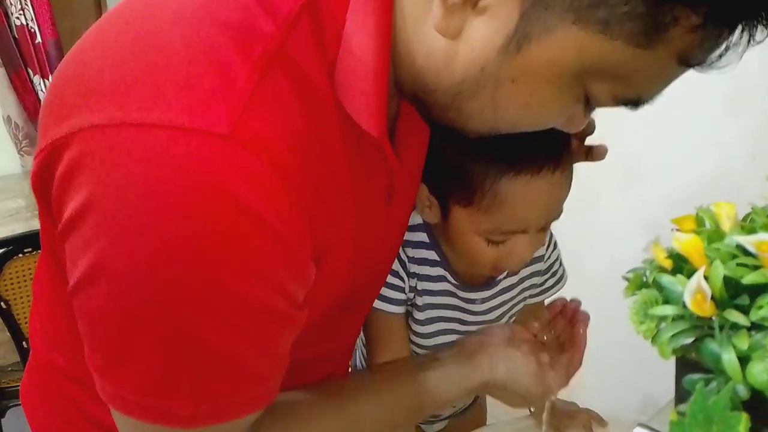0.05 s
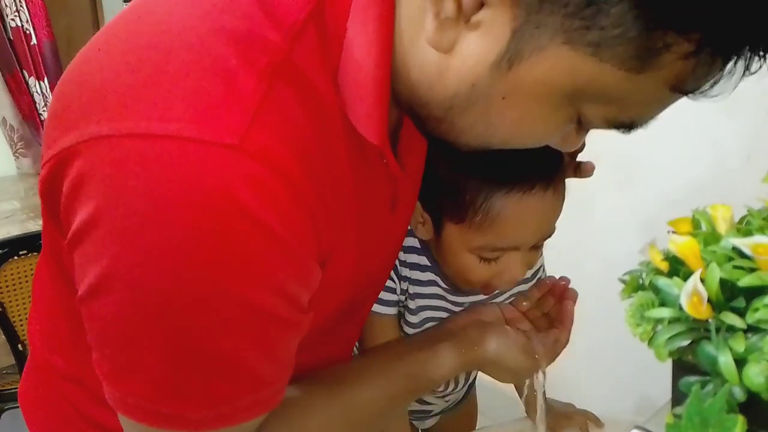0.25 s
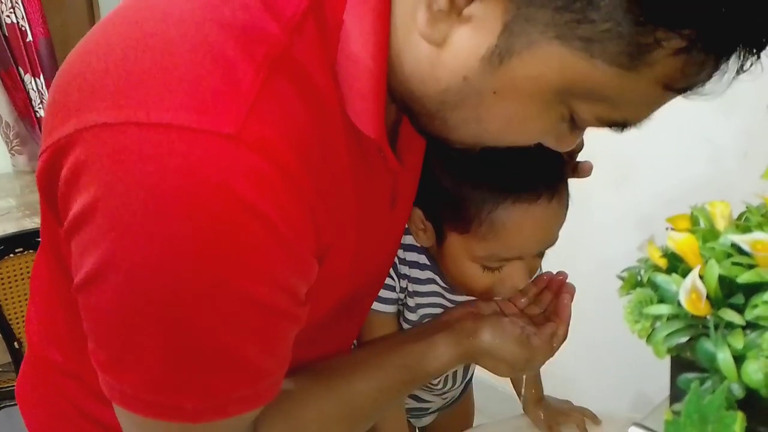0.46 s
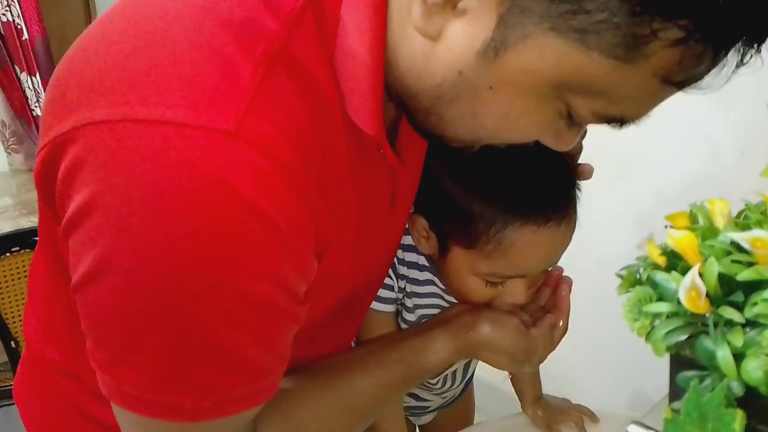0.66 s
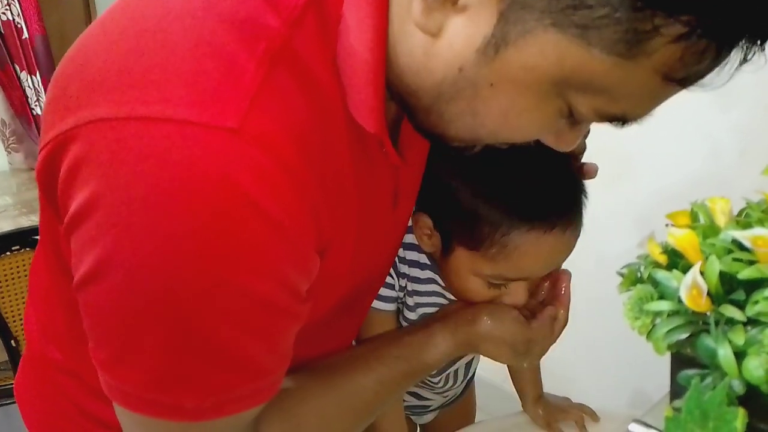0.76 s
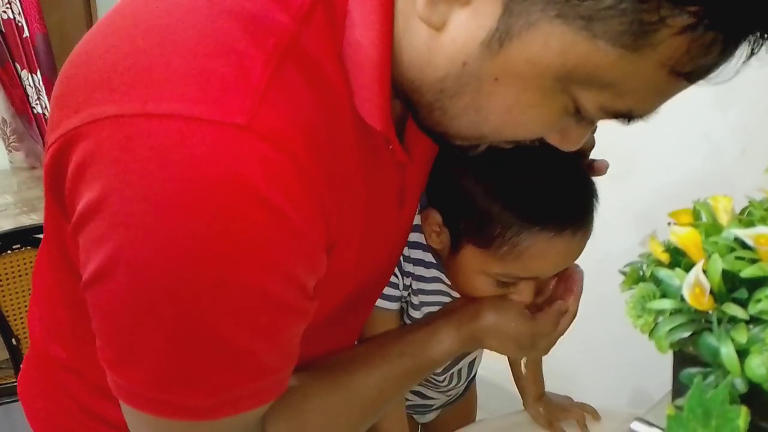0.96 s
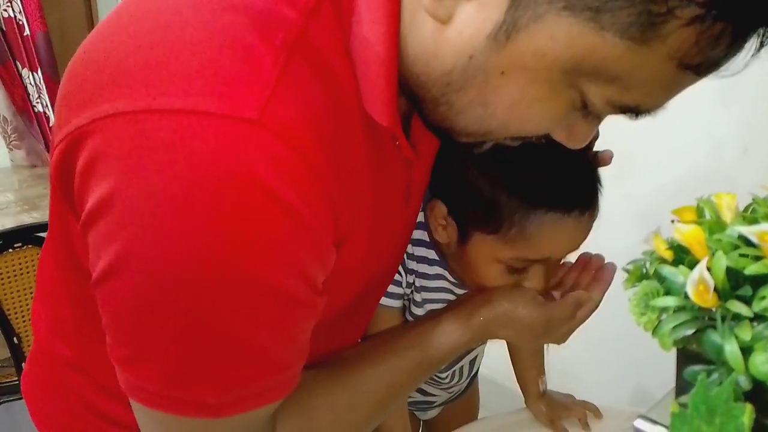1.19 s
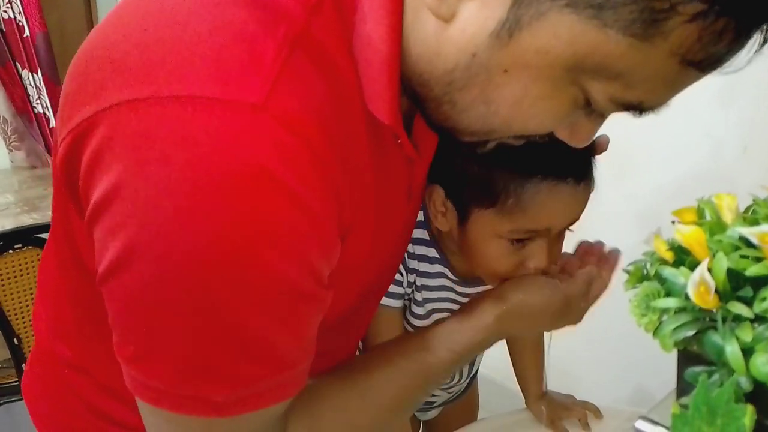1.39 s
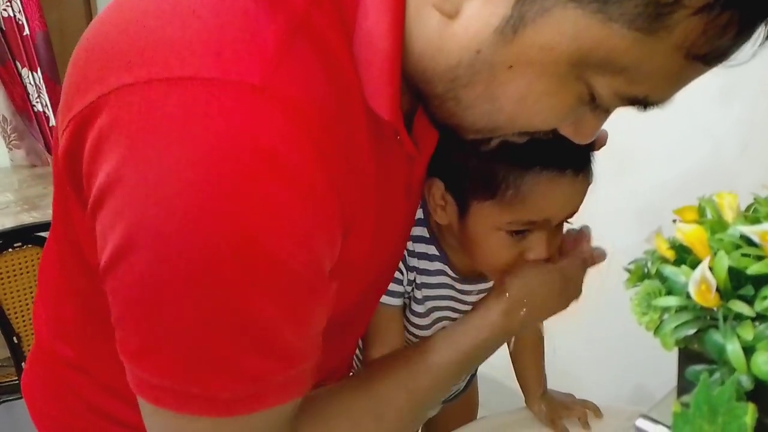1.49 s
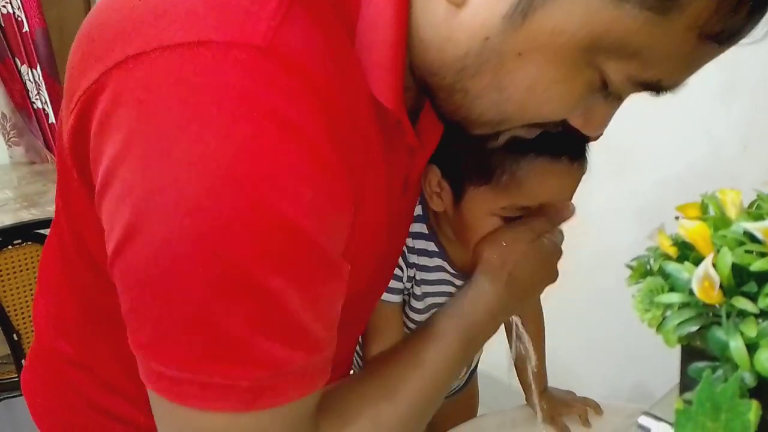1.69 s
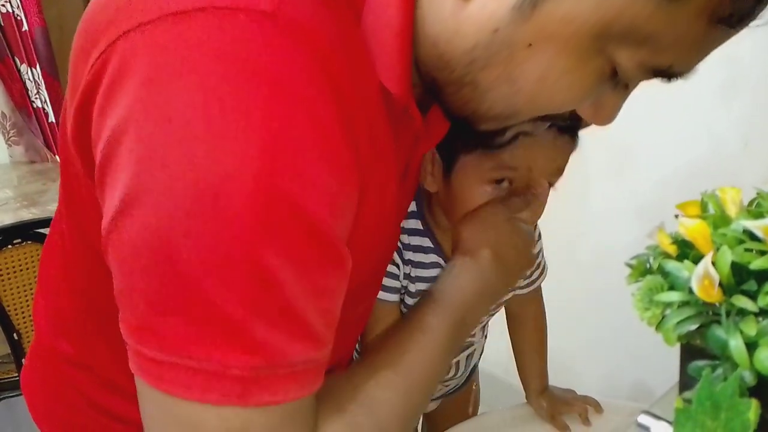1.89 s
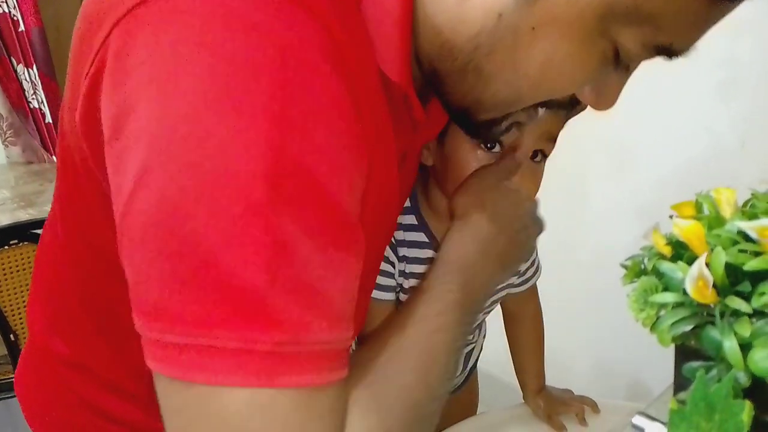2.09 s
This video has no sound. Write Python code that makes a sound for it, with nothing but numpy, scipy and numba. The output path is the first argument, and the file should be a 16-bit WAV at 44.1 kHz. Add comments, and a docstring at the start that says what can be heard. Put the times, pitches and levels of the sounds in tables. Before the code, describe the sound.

A steady splashy trickle of water falls through hands into a sink, plopping unevenly, then bursting into a denser gurgle near the end; a faint machine hum sits beneath, close phone microphone, short room reflections.

```python
"""Tap water over cupped hands

Water runs over cupped hands into a basin in a small hard-walled room, heard from a phone a step away.
Thousands of short sines (gliding bubbles and steady-pitched droplet ticks) and hiss, filtered, make the stream.
Louder, timed bubble tones plop as short rings, droplets splat as noise bursts, and walls add a short tail.
A machine hums one wavering sine over a faint mains tone and a low rumble of filtered noise."""
import sys
import numpy as np
from scipy import signal
from scipy.fft import rfft, irfft
from scipy.io import wavfile
from scipy.ndimage import uniform_filter1d
from numba import njit

SR = 44100
rng = np.random.default_rng(int(sys.argv[2]) if len(sys.argv) > 2 else 0)


def boost(x):
    """Linear amplitude factor 10**(x/20) for a level x in decibels (scalar or array-like)."""
    u = np.asarray(x, float) / 20
    return 10 ** u


def put_to_file(sound):
    """Save the sound as 16-bit audio at rate SR, in the file named by the first command-line argument."""
    columns = np.atleast_2d(sound).T  # one column per channel
    safe = np.clip(columns, -1, 1)
    whole_steps = np.round(safe * 32767)
    wavfile.write(sys.argv[1], SR, whole_steps.astype(np.int16))


N = 94506  # length in samples

# colour of the low rumble: f/Hz, relative level/dB
RUMBLE_COLOUR = [(25, -44), (70, -27), (98, -21.5), (115, -19.5), (165, -24.5), (215, -4), (300, -3.5),
                 (370, 0.5), (450, -12), (490, -11.5), (520, -7.5), (560, -17), (700, -22.5), (1200, -35)]
# swell of the low rumble: t/s, rms level/dB
RUMBLE_SWELL = [(0, -42), (.12, -43), (.3, -46.5), (.55, -47.5), (.75, -44.5), (1, -49.5), (1.15, -45),
                (1.25, -47), (1.45, -42), (1.78, -48.5), (1.9, -44.5), (2.14, -47)]
# decay of the wall echoes, one band each: f/Hz, time to fall 60 dB/s
WALL_DECAY = [(500, 0.22), (1500, 0.2), (3000, 0.18), (6000, 0.14), (12000, 0.036)]
# droplets that smack the glaze: t/s, size before the noise level is applied/dB
SPLAT_HITS = [(0.417, -36), (0.4722, -47), (0.5096, -39), (0.5939, -42), (0.68, -30.5), (0.817, -35),
              (0.8559, -39), (0.9008, -40), (0.996, -30.5), (1.2235, -39), (1.47, -36), (1.706, -40),
              (1.7403, -37), (1.7748, -36), (1.7967, -40), (2.0234, -37)]
# colour of a smack: f/Hz, relative level/dB
SPLAT_COLOUR = [(2000, -24), (5000, -1), (8000, 6), (11000, -3), (15000, -9)]
# loud short tones in the splashing, bubbles and their echoes: t of full swell/s, dry level/dB, starting f/Hz
PLOP_TONES = [(0.008, -22, 3000), (0.0833, -20, 2750), (0.0907, -18.5, 2880), (0.1517, -23, 2840),
              (0.155, -30, 3180), (0.1833, -23, 3270), (0.198, -22.5, 2800), (0.2257, -26, 3320),
              (0.2907, -37, 2800), (0.3455, -23, 4400), (0.374, -34.5, 1120), (0.4507, -24, 2180),
              (0.456, -19.5, 2280), (0.46, -20, 2620), (0.478, -24, 2920), (0.5252, -19, 3440),
              (0.527, -32, 1160), (0.534, -18, 2750), (0.5381, -19.5, 2610), (0.5697, -23, 3900),
              (0.5894, -29, 1620), (0.626, -29, 3810), (0.632, -29, 1420), (0.6321, -33, 5150),
              (0.6361, -22.5, 1910), (0.6448, -20, 2630), (0.655, -24, 2950), (0.7584, -17, 2320),
              (0.7635, -13, 2640), (0.7683, -17.5, 2500), (0.778, -23, 2500), (0.7827, -22, 2500),
              (0.7917, -24.5, 1820), (0.799, -29, 2380), (0.8416, -24, 2700), (0.8633, -18, 2500),
              (0.873, -20.5, 2120), (0.9079, -29, 4760), (0.9186, -24, 2450), (0.999, -36, 1180),
              (1.0022, -27, 2080), (1.0327, -21, 2700), (1.0603, -24, 2040), (1.118, -35, 1004),
              (1.135, -29, 3030), (1.2285, -24, 2700), (1.2362, -30, 2650), (1.247, -25, 3100),
              (1.256, -32, 2560), (1.2803, -23, 3120), (1.2888, -17.5, 2170), (1.3281, -21, 2400),
              (1.3344, -31.5, 1270), (1.341, -22, 2030), (1.3417, -30.5, 1130), (1.3584, -19, 2630),
              (1.3617, -20, 2610), (1.3707, -19.5, 2650), (1.389, -24, 2700), (1.4035, -22, 3470),
              (1.422, -22, 3210), (1.4816, -25, 3280), (1.5795, -19.5, 2650), (1.667, -18, 2970),
              (1.6767, -18, 3210), (1.6996, -32, 1160), (1.7452, -19, 2900), (1.7863, -26, 3060),
              (1.8037, -27, 5210), (1.8039, -25, 2120), (1.831, -33, 1900), (1.899, -28, 2670),
              (1.9277, -8, 2760), (1.931, -15.5, 2780), (1.9383, -24, 3200), (1.943, -16, 2840),
              (1.9497, -17, 2860), (1.9566, -17, 2560), (1.9672, -18, 3040), (1.9737, -22, 3230),
              (1.9813, -18, 2570), (1.984, -22, 5850), (1.998, -20, 3020), (2.0012, -25, 2150),
              (2.0189, -18, 2820), (2.0222, -12.5, 2690), (2.0297, -15, 2760), (2.0503, -20, 2720),
              (2.0562, -20, 2930), (2.0636, -20, 2740), (2.0783, -14, 1980), (2.0898, -17, 2070),
              (2.1052, -27, 2150), (2.1065, -25, 3790), (2.118, -24, 4080), (2.1184, -26, 2160),
              (2.119, -24, 2890), (2.124, -35, 2870)]
# colour of water, basin and microphone: f/Hz, relative level/dB
WATER_COLOUR = [(350, -46.5), (600, -21.5), (758, -21.5), (834, -16), (1210, -15), (1570, -13.5),
                (1960, -5), (2310, -6), (2800, -0.5), (3830, -11), (6730, -18.5), (7730, -28),
                (8860, -27.5), (14900, -51), (16000, -35)]
# swell of the stream's body, below the spatter, before the basin rings: t/s, rms level/dB
BODY_SWELL = [(0, -34.5), (.07, -37), (.17, -35), (.3, -33), (.43, -34.5), (.6, -32), (.75, -34),
              (.8, -31.5), (.88, -34), (1.03, -34), (1.2, -34), (1.4, -32.5), (1.55, -34), (1.7, -33.5),
              (1.85, -32), (1.915, -35), (1.96, -32.5), (2.01, -33.5), (2.14, -30.5)]
# swell of the spatter, 4 to 7.5 kHz, before the basin rings: t/s, rms level/dB
SPATTER_SWELL = [(0, -40.5), (.08, -46), (.2, -45), (.35, -43), (.45, -44), (.6, -40), (.73, -49),
                 (.78, -40), (.92, -42), (1.05, -43), (1.3, -43), (1.5, -44), (1.65, -46), (1.8, -41.5),
                 (1.91, -45.5), (1.98, -42.5), (2.05, -46.5), (2.14, -39.5)]
# swell of the spray, above 7.5 kHz, before the basin rings: t/s, rms level/dB
SPRAY_SWELL = [(0, -53), (.12, -55), (.3, -52), (.5, -51), (.62, -52), (.7, -53), (.8, -57), (.85, -51),
               (1.03, -48), (1.17, -53.5), (1.3, -53), (1.45, -51), (1.65, -54.5), (1.8, -51), (1.9, -54),
               (2.03, -48), (2.14, -58)]
# narrow rings of the basin: f/Hz, width/Hz, level/dB
BASIN_RINGS = [(2710, 9.3, 2), (2560, 8.3, -8), (2000, 17, -29), (1890, 63, -26), (2740, 13, -33),
               (3330, 33, -5.5)]


def set_rms(x, db):
    """Scale a signal to an rms level in dB."""
    return x * boost(db) / np.sqrt(np.mean(x ** 2))


def swell(table):
    """Gain per sample from a table of times and levels in dB, interpolated in dB."""
    t, db = np.array(table, float).T
    return boost(np.interp(np.arange(N) / SR, t, db))


def colour(x, points, size=4096):
    """Causal minimum-phase filter with the given response, drawn over log frequency."""
    points_hz, points_db = np.array(points, float).T
    hz = np.maximum(np.fft.rfftfreq(size, 1 / SR), 1)
    gain = boost(np.interp(np.log(hz), np.log(points_hz), points_db))
    # folding the cepstrum onto positive time makes the phase minimal
    cepstrum = irfft(np.log(gain))
    cepstrum[1:size // 2] *= 2
    cepstrum[size // 2 + 1:] = 0
    impulse = irfft(np.exp(rfft(cepstrum)))
    return signal.fftconvolve(x, impulse)[:N]


def even(x, size=801):
    """Flatten the broad spectrum, smoothed over size bins, and set the rms to 1."""
    spectrum = rfft(x)
    broad_power = uniform_filter1d(abs(spectrum) ** 2, size=size)
    return set_rms(irfft(spectrum / np.sqrt(broad_power), len(x)), 0)


def band(x, hz, width_hz):
    """Resonance with gain 1 at its centre."""
    return signal.lfilter(*signal.iirpeak(hz, hz / width_hz, fs=SR), x)


def walk(per_s):
    """Slow random drift: so many random values a second, smoothed twice."""
    k = int(SR / per_s)
    steps = np.repeat(rng.standard_normal(N // k + 1), k)
    return 1.35 * uniform_filter1d(uniform_filter1d(steps, k), k)[:N]


@njit
def ring(start, hz, cycles, glide, size, rise, n):
    """Each grain is a sine that swells for rise cycles, then decays; any glide raises its pitch."""
    out = np.zeros(n)
    for k in range(len(start)):
        tau = cycles[k] * SR / hz[k]  # decay constant in samples
        step = 2 * np.pi * hz[k] / SR
        up = rise * SR / hz[k]  # swell in samples
        phase = 0.
        for j in range(min(int(6 * tau + up) + 1, n - start[k])):
            phase += min(step * (1 + glide[k] * j / tau), 2.8)  # stays below half the sample rate
            a = min(j / up, 1.)
            envelope = a * a * (3 - 2 * a) * np.exp(-max(j - up, 0.) / tau)
            out[start[k] + j] += size[k] * envelope * np.sin(phase)
    return out


def tail():
    """Wall echoes, sparse and then diffuse, unit energy, dying faster in the treble."""
    first_echo_s, echoes_per_s, growth_s = 0.0024, 2500, 0.02
    t = np.arange(SR // 2) / SR
    # echo density grows with the square of time
    share = np.clip(echoes_per_s / SR * (1 + (t / growth_s) ** 2), 0, 1)
    present = rng.random(len(t)) < share
    spikes = rng.standard_normal(len(t)) * present / np.sqrt(share) * (t > first_echo_s)
    echo = np.zeros(len(t))
    for hz, t60 in WALL_DECAY:
        part = band(band(spikes, hz, hz), hz, hz)
        echo += part * np.exp(-np.log(1000) * t / t60) / np.sqrt(t60)
    return even(echo, size=301) / np.sqrt(len(t))


def with_walls(x, room_db):
    """Add a fresh wall tail at a level relative to the dry sound."""
    return x + boost(room_db) * signal.fftconvolve(x, tail())[:N]


def machine():
    """A sine wavering in pitch and level and a faint mains tone, over a rumble of filtered noise."""
    hum_hz, hum_db, waver_hz, waver_db = 246, -43, 0.99, 1.36
    mains_hz, mains_db, mains_waver_db = 99, -72, 3.5
    phase = 2 * np.pi * np.cumsum(hum_hz + waver_hz * walk(13.13)) / SR
    # the root of two makes the levels rms
    hum = np.sqrt(2) * boost(hum_db + waver_db * walk(14.07)) * np.sin(phase)
    mains_tone = np.sin(2 * np.pi * mains_hz * np.arange(N) / SR)
    mains = np.sqrt(2) * boost(mains_db + mains_waver_db * walk(5.37)) * mains_tone
    rumble = set_rms(colour(rng.standard_normal(N), RUMBLE_COLOUR, size=16384), 0)
    return hum + mains + rumble * swell(RUMBLE_SWELL)


def splats():
    """Droplets smack as bright noise bursts that start within a millisecond; the walls answer."""
    rise_s, t60_s, noise_db, room_db = 0.00086, 0.018, -5, -3
    t, db = np.array(SPLAT_HITS, float).T
    hits = np.zeros(N)
    hits[(t * SR).astype(int)] = boost(db)
    s = np.arange(SR // 20) / SR
    burst = np.exp(-np.log(1000) * s / t60_s) * np.minimum(s / rise_s, 1)
    noise = set_rms(colour(rng.standard_normal(N), SPLAT_COLOUR), noise_db)
    return with_walls(signal.fftconvolve(hits, burst)[:N] * noise, room_db)


def plops():
    """Loud, timed bubble tones ring briefly and rise slightly in pitch; the walls answer."""
    rise_cycles, decay_cycles, glide, room_db = 2.496, 3.92, 0.023, -4
    t, db, hz = np.array(PLOP_TONES, float).T
    same = np.ones(len(t))
    start = ((t - rise_cycles / hz) * SR).astype(np.int64)
    x = ring(start, hz, decay_cycles * same, glide * same, boost(db), rise_cycles, N)
    return with_walls(x, room_db)


def swarm(per_s, cycles, glide, spread_db, rise):
    """Random grains of all pitches, a few much louder than the rest, with a wall tail of their own."""
    room_db = 2.5
    when, pitch, rarity, length, bend = rng.random((int(per_s * N / SR), 5)).T
    hz = 600 * (17000 / 600) ** pitch  # 600 Hz to 17 kHz
    size = hz * boost(-spread_db * np.log(rarity).clip(-4))
    start = (when * N).astype(np.int64)
    x = ring(start, hz, cycles * (.5 + length), glide * 2 * bend, size, rise, N)
    # circular echo: the walls already ring at the start
    echo = irfft(rfft(x) * rfft(tail(), N), N)
    return even(x + boost(room_db) * echo)


def stream():
    """Bubbles, ticks and fine hiss, coloured by the basin; body, spatter and spray swell separately."""
    tick_db, hiss_db, hiss_waver_db = -1.5, -4, 1.6  # against the bubbles
    bubbles = swarm(per_s=1200, cycles=5.44, glide=0.1403, spread_db=3.5, rise=0.37)
    ticks = swarm(per_s=3000, cycles=0.99, glide=0., spread_db=6, rise=0.25)
    hiss = boost(hiss_db + hiss_waver_db * walk(25)) * rng.standard_normal(N)
    water = colour(bubbles + boost(tick_db) * ticks + hiss, WATER_COLOUR)

    def above(hz):
        """Zero-phase high-pass, so that the layers split cleanly."""
        return signal.sosfiltfilt(signal.butter(2, hz, "high", fs=SR, output="sos"), water)

    upper, spray = above(4000), above(7500)
    body = set_rms(water - upper, 0) * swell(BODY_SWELL)
    spatter = set_rms(upper - spray, 0) * swell(SPATTER_SWELL)
    return body + spatter + set_rms(spray, 0) * swell(SPRAY_SWELL)


def basin(x):
    """The bowl adds its narrow resonances."""
    return x + sum(boost(db) * band(x, hz, width_hz) for hz, width_hz, db in BASIN_RINGS)


def scene():
    """Stream and plops ring the basin; splats and machine join unringed, in mono."""
    water = basin(stream() + plops())
    return (water + splats() + machine())[None, :]


def band_limit(x):
    """A steep low-pass at the top of the band."""
    return signal.sosfilt(signal.butter(12, 16310, fs=SR, output="sos"), x)


def record(dry):
    """The phone cuts the very top with a steep low-pass."""
    top_hz, ripple_db, stop_db = 15500, .2, 60
    low_pass = signal.ellip(10, ripple_db, stop_db, top_hz, fs=SR, output="sos")
    mix = signal.sosfilt(low_pass, dry)
    return band_limit(mix)


dry = scene()
out = record(dry)
put_to_file(out)
```